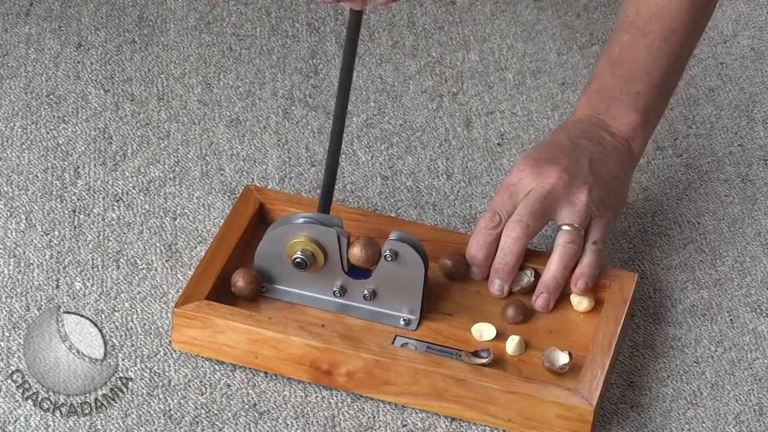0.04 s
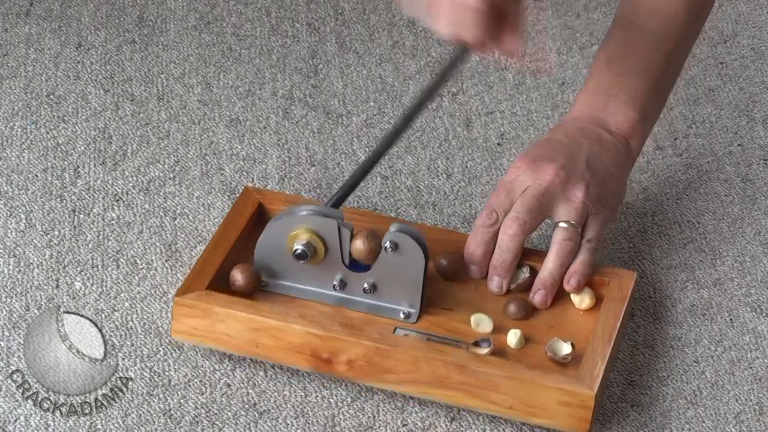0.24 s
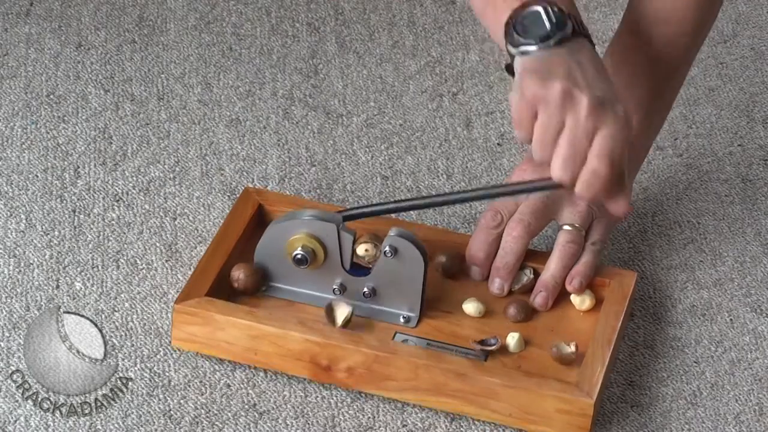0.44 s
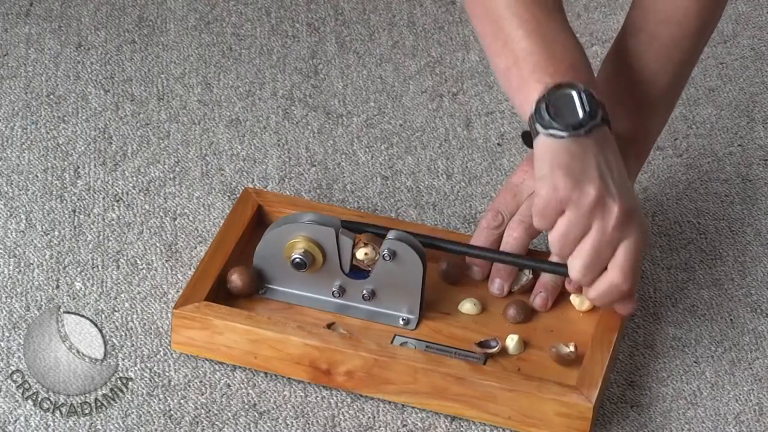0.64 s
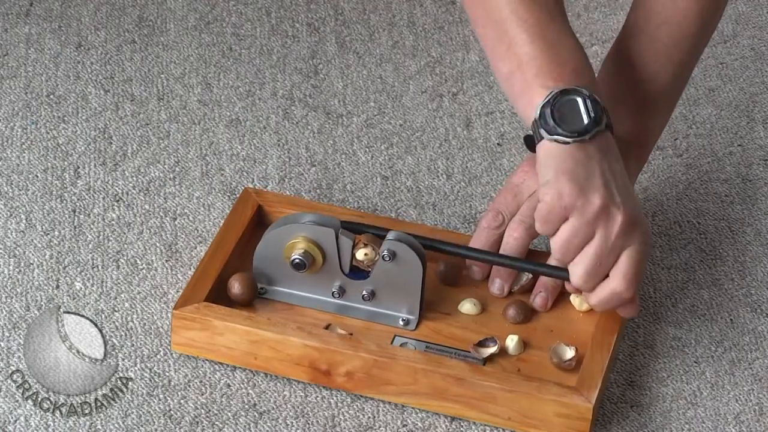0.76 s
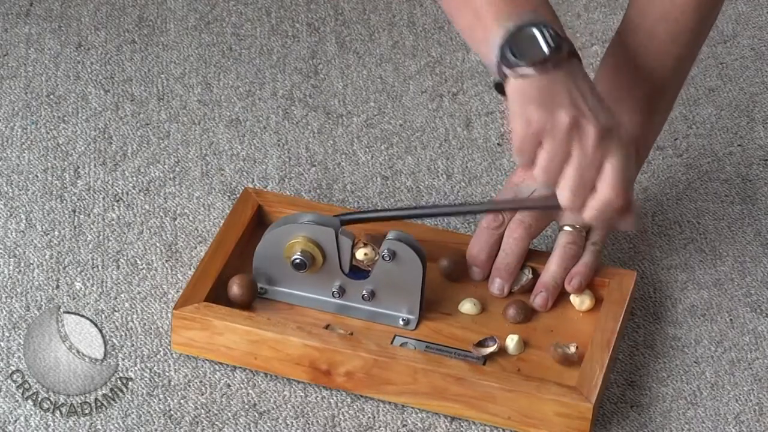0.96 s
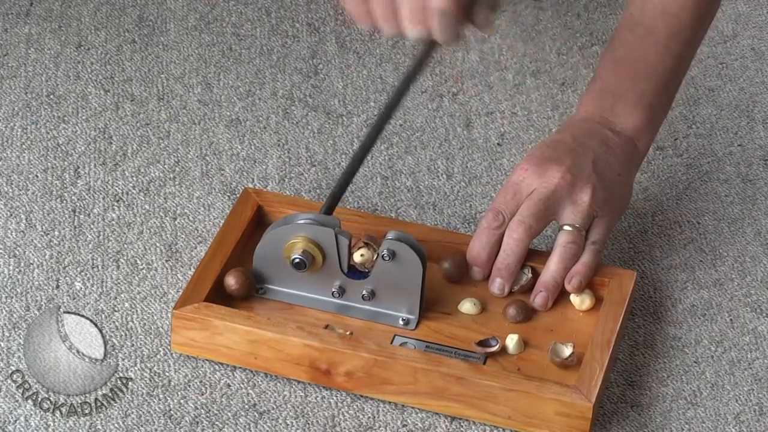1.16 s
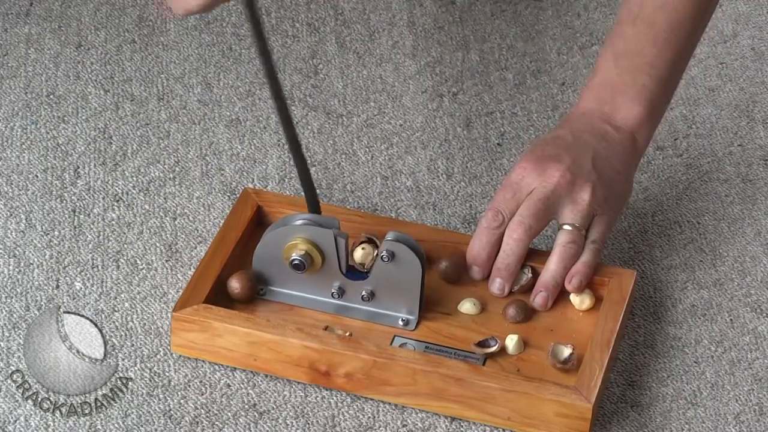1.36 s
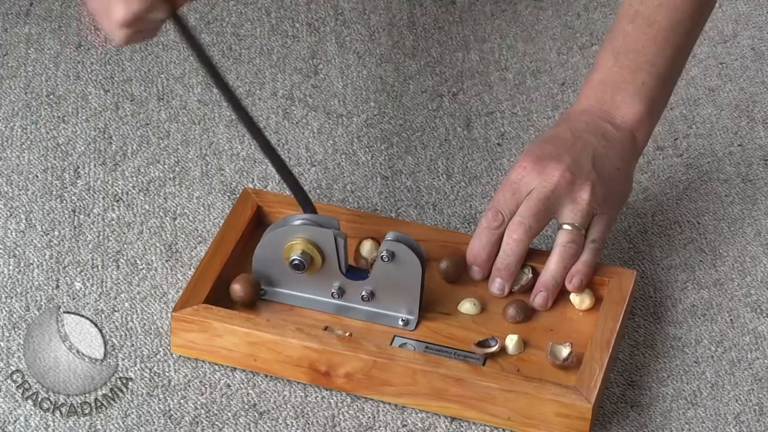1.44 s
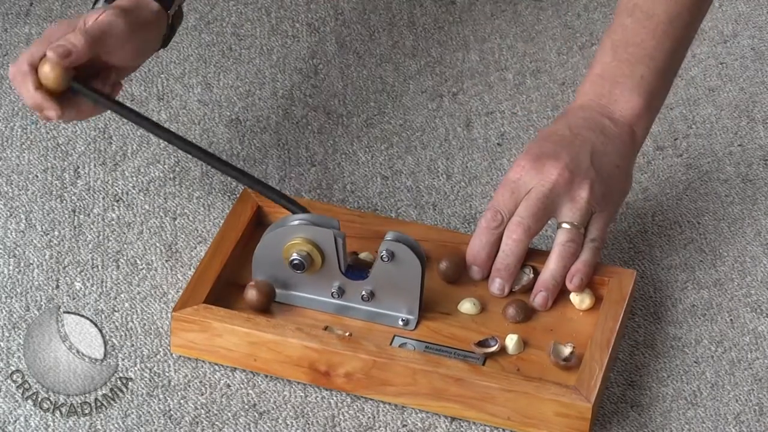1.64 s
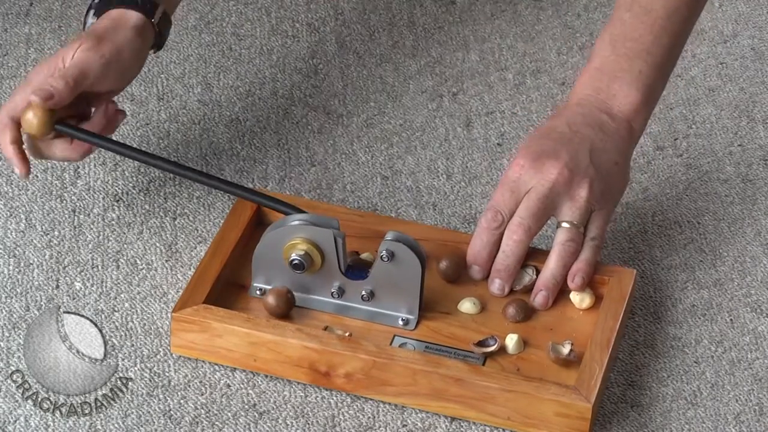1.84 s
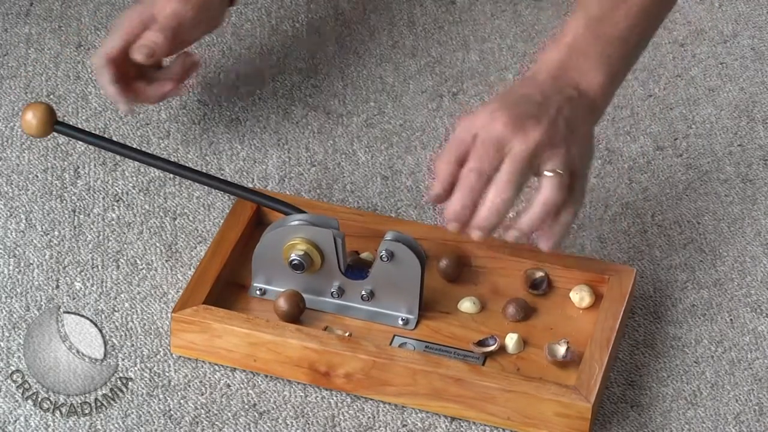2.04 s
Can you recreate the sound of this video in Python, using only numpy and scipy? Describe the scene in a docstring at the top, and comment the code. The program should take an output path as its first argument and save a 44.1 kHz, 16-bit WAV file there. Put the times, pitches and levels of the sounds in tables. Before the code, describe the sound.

A hard nut shell cracks in a steel nutcracker, with bits ticking onto wood.

```python
"""In a small room, a steel lever nutcracker works on a wooden tray. The jaw crunches into a hard shell, which
gives way in tiny slips until it bursts. Splinters land on the tray and the lever clacks against its stop. As
the lever swings back, its pivot rubs faintly, a loose nut knocks about, a few stray bits of shell tick, and the
cracked nut drops through the jaws. Each hit is a short tick plus a knock from the ringing tray."""
import sys
import numpy as np
from scipy import signal
from scipy.fft import rfft, irfft
from scipy.io import wavfile
from scipy.ndimage import uniform_filter1d, minimum_filter1d

SR = 44100
rng = np.random.default_rng(int(sys.argv[2]) if len(sys.argv) > 2 else 0)


def log_audio(samples):
    """Write samples as a 16-bit WAV file to the path given in sys.argv[1]."""
    # one column per channel
    frames = np.atleast_2d(samples).T
    # limit to full scale, then quantise
    limited = np.clip(frames, -1, 1)
    pcm = np.round(limited * 32767).astype(np.int16)
    wavfile.write(sys.argv[1], SR, pcm)


N = 92610
SPOTS = 3  # places on the tray, each with its own echoes

# Hits, each a tick and a tray knock: start_s, level_db, brightness_db_per_octave, knock_db
SPLINTER_HITS = [(.002, -59, 7, -72), (.4724, -40.5, 8, -45.5), (.478, -49, 11, -52),
                 (.4917, -35.5, -7, -44), (.497, -31.5, -6, -50), (.503, -32.5, 19.5, -62.5),
                 (.5088, -34.5, 17.5, -52), (.5314, -19.5, 4.5, -45.5), (.5372, -17.5, 1, -32.5),
                 (.551, -28, 0, -44.5), (.583, -42.5, -12.5, -54), (.628, -56, 16, -50.5)]
SHELL_SNAPS = [(.2099, -46, 16.5, -65.5), (.2158, -50, 13, -62.5), (.2363, -34.5, 8.5, -47.5),
               (.3772, -17.5, 0.5, -27), (.383, -21.5, -5, -23), (.3965, -21.5, -5.5, -35),
               (.4015, -36.5, 18, -36.5), (.4165, -23.5, 1.5, -40.5)]
LEVER_CLACKS = [(0.7151, -38.5, -8, -62), (0.716, -22, -2, -43), (0.718, -19.5, 3, -45.5),
                (0.7222, -24, -3, -36)]
LATE_HITS = [(1.281, -61, 12.5, -85), (1.2865, -56, 11, -85), (1.3095, -54, -16, -62),
             (1.503, -60, -5.5, -80), (1.5233, -48.5, 1, -69), (1.5264, -33, -1.5, -44.5),
             (1.532, -27.5, 6, -45), (1.5383, -34.5, 7, -50), (1.5462, -30.5, 1.5, -52),
             (1.5528, -33, 5, -49), (1.9445, -62.5, -1, -88)]
# Single squeaks, booms and bumps: start_s, level_db
JAW_SQUEAKS = [(.247, -35.5), (.261, -28), (.269, -28), (.276, -34.5), (.308, -36.5)]
TRAY_BOOMS = [(.262, -63.5), (.392, -45.5), (0.534, -71)]
NUT_BUMPS = [(1.1321, -65), (1.159, -81), (1.1947, -76), (1.8105, -59.5), (1.822, -61.5), (1.845, -64),
             (1.8977, -63), (1.921, -64), (1.956, -75), (1.994, -85), (2.0454, -71)]
# How longer sounds swell and fade: time_s, level_db
CREAK_LEVELS = [(.191, -63), (.207, -69.5), (.211, -46.5), (.235, -55)]
CRUNCH_LEVELS = [(.2362, -18.5), (.255, -29.5), (.275, -24.5), (.30, -21), (.332, -25.5), (.35, -29),
                 (.362, -28.5), (.369, -22), (.375, -34)]
PIVOT_LEVELS = [(1.04, -75), (1.1, -74.5), (1.182, -70), (1.26, -84), (1.62, -75.5), (1.76, -72.5),
                (1.9, -75.5), (2.05, -76)]
# A sound's colour is how strong it is from low to high: pitch_hz, relative_level_db
AIR_COLOUR = [(15, -41), (25, -3), (125, -2.5), (383, -10), (573, -3), (729, -14.5), (1090, -17),
              (1180, -17), (1460, -9.5), (2020, -15.5), (2240, -15), (2780, -17), (3260, -14),
              (4260, -20.5), (7890, -17), (10600, -29), (15000, -49.5)]
SPLINTER_COLOUR = [(60, -25.5), (300, -23.5), (600, -22), (1200, -6.5), (1900, -7), (3200, -1.5),
                   (4700, -9.5), (5900, -6), (7000, 0), (9200, -0.5), (10500, -10.5), (12500, -21.5),
                   (15500, -37)]
CRUNCH_COLOUR = [(20, -46.5), (55, -23.5), (150, -35.5), (450, -39), (800, -27), (1300, -7.5), (1700, -9),
                 (2000, -11.5), (2380, -5), (2700, -13), (3250, 0.5), (4000, -12), (6100, -11), (7300, -1),
                 (7950, 4), (8600, -5), (9900, -8.5), (12000, -25), (15500, -29.5)]
SHELL_COLOUR = [(50, -25.5), (150, -28.5), (400, -28.5), (800, -21.5), (1200, -5), (1900, -12), (2500, -4),
                (4400, -1.5), (5200, 3), (7500, 1), (9000, -3), (11200, -14), (15500, -25)]
BOOM_COLOUR = [(25, -21), (45, -1.5), (70, 1), (120, -11), (250, 1), (330, -1.5), (520, 4), (800, 5.5),
               (1300, -14.5), (3000, -50)]
STEEL_COLOUR = [(60, -37), (300, -35), (750, -37), (1100, -25.5), (1430, -12.5), (1950, -15), (2400, -5.5),
                (3000, -6.5), (3750, -9.5), (4350, -5.5), (4900, -4.5), (5250, -7.5), (6100, 0.5),
                (7200, -2.5), (8250, 0.5), (9200, -8.5), (9700, -12.5), (12100, -14), (15500, -31)]
PIVOT_COLOUR = [(100, -23), (300, -13), (450, -7.5), (580, 2.5), (760, -11), (1500, -12.5), (4000, -27)]
NUT_COLOUR = [(100, -49), (950, -33), (1600, -7.5), (2200, -8), (3150, -2.5), (4300, -9.5), (5800, -7),
              (7300, -11), (8250, -9), (9700, -21.5), (12000, -31.5), (15500, -44)]
# Tones that the tray and jaw ring with: pitch_hz, relative_level_db, fade_s (time to drop 60 dB)
TRAY_TONES = [(575, -28, .08), (731, -22, 0.06), (1163, -17, .03), (1364, -5, .04), (1433, 3.5, 0.033),
              (1510, -4, 0.054), (1709, -8.5, 0.079), (2296, -6, .045), (3240, -15, .04), (3307, -9, .04)]
JAW_TONES = [(2880, 1, 0.037), (3250, -4, 0.059), (3280, -1.5, .04)]
# How long the room's echo lasts: pitch_hz, fade_s
ROOM_FADES = [(100, 0.55), (500, 0.32), (1400, 0.33), (3500, 0.35), (7000, 0.37), (10000, 0.3),
              (15000, .24)]
# Stereo width, as a gain on the side signal (what differs between the ears): pitch_hz, gain_db
STEREO_WIDTH = [(40, -28.5), (100, -21.5), (250, -17.5), (700, -14), (1200, -11.5), (2400, -14),
                (4500, -16.5), (6500, -19), (8000, -17.5), (10000, -5.5), (12500, -23)]


def amp(db):
    return 10 ** (np.asarray(db) / 20)


def unit(x):
    """Scales a sound to an energy of one."""
    return x / np.sqrt(np.sum(x ** 2) + 1e-20)


def read(points, hz):
    """Looks up values between a table's pitches."""
    pitches, values = np.transpose(points)
    return np.interp(np.log(hz + 1), np.log(pitches + 1), values)


def add(mix, start_s, sound):
    part = mix[max(round(start_s * SR), 0):][:len(sound)]
    part += sound[:len(part)]


def tint(colour, tilt_db=0, size=4096):
    """A filter that gives a sound its colour; tilt_db per octave brightens the treble."""
    hz = np.fft.rfftfreq(size, 1 / SR)
    octaves = np.log2(np.clip(hz, 1500, 10000) / 4000)
    log_gain = np.log(amp(read(colour, hz) + tilt_db * octaves))
    mirrored = np.concatenate([log_gain, log_gain[-2:0:-1]])
    spectrum = np.exp(np.conj(signal.hilbert(mirrored)))  # keeps the start sharp
    return unit(np.fft.ifft(spectrum).real[:size // 2])


def ring(tones, size=4000):
    """A struck object rings with fading tones, never quite the same. Being small, it has little bass."""
    t = np.arange(size) / SR
    chance = rng.standard_normal((len(tones), 2)) * [1.5, .007]
    sound = np.zeros(size)
    for k, ((hz, db, fade_s), (extra_db, detune)) in enumerate(zip(tones, chance)):
        level = amp(db + extra_db) * np.exp(-np.log(1000) * t / fade_s)
        sound += (-1) ** k * level * np.sin(2 * np.pi * hz * (1 + detune) * t)
    return unit(signal.lfilter(*signal.butter(2, 600, "high", fs=SR), sound))


def tick(colour, tilt_db, decay_s, click_share, size=1024):
    """Two things touch: a sharp click and a quickly fading hiss."""
    hiss = rng.standard_normal(size) * np.exp(-np.arange(size) / SR / decay_s)
    sound = np.sqrt(1 - click_share) * unit(hiss)
    sound[0] += np.sqrt(click_share)
    return unit(signal.fftconvolve(sound, tint(colour, tilt_db)))


def blow(db):
    """The size of a hit whose level is averaged over 5 ms."""
    return amp(db) * np.sqrt(.005 * SR)


def hits(rows, colour, decay_s, click_share, tray_tilt_db=0):
    """Each hit ticks in its own material and knocks the tray at one of a few spots."""
    out = np.zeros((SPOTS, N))
    tones = [(hz, db + tray_tilt_db * np.log2(max(hz / 1500, 1)), fade_s)
             for hz, db, fade_s in TRAY_TONES]
    for k, (start_s, db, tilt_db, knock_db) in enumerate(rows):
        add(out[k % SPOTS], start_s, blow(db) * tick(colour, tilt_db, decay_s, click_share))
        add(out[k % SPOTS], start_s, blow(knock_db) * ring(tones))
    return out


def air(level_db=-72, drift_db=1.7):
    """Faint, drifting room noise, as mid (what both ears share) and side."""
    hz, _, spectrum = signal.stft(rng.standard_normal((2, N)), SR, nperseg=2048)
    drift = uniform_filter1d(rng.standard_normal(spectrum.shape[1:]), size=14, axis=0)
    drift = uniform_filter1d(drift, size=5, axis=1)
    gain = amp(read(AIR_COLOUR, hz)[:, None] + drift_db * drift / drift.std())
    mid, side = signal.istft(spectrum * gain, SR, nperseg=2048)[1][:, :N]
    return amp(level_db) / mid.std() * np.array([mid, amp(9.5) * side])


def splinters():
    """Bits of shell land on the tray with sharp ticks."""
    return hits(SPLINTER_HITS, SPLINTER_COLOUR, decay_s=.001, click_share=.6)


def shell_slips(levels, tilt_db, knock_db, count, slips_per_s=520):
    """The shell gives way in a fast, uneven run of tiny slips that each knock the tray."""
    times_s, levels_db = np.transpose(levels)
    chance = rng.standard_normal((count, 3))
    gaps_s = np.exp(.5 * chance[:, 0]) / slips_per_s
    starts_s = times_s[0] + np.cumsum(gaps_s) - gaps_s[0]
    sizes = np.sqrt(SR / slips_per_s) * amp(np.interp(starts_s, times_s, levels_db))
    out = np.zeros((SPOTS, N))
    for k, start_s in enumerate(starts_s):
        slip = tick(CRUNCH_COLOUR, tilt_db + chance[k, 2], decay_s=.00099, click_share=.28)
        add(slip, 0, amp(knock_db) * ring(TRAY_TONES, size=2500))
        if start_s < times_s[-1]:
            add(out[k % SPOTS], start_s, sizes[k] * slip)
    return out


def crunch():
    """A thin creak as the jaw starts to press, then the full crunch."""
    creak = shell_slips(CREAK_LEVELS, tilt_db=9.5, knock_db=-33, count=40)
    return creak + shell_slips(CRUNCH_LEVELS, tilt_db=1, knock_db=-18, count=120)


def shell_snaps():
    """The squeezed shell cracks, then bursts."""
    return hits(SHELL_SNAPS, SHELL_COLOUR, decay_s=.002, click_share=.25)


def jaw_squeaks():
    """The steel jaw rings briefly as it bites into the shell."""
    out = np.zeros((SPOTS, N))
    for k, (start_s, db) in enumerate(JAW_SQUEAKS):
        add(out[k % SPOTS], start_s, blow(db) * ring(JAW_TONES))
    return out


def tray_boom(rise_s=.0083, decay_s=.049):
    """The hardest jolts make the tray and floor boom: low noise that swells and dies away."""
    out, t = np.zeros(N), np.arange(SR) / SR
    swell = (1 - np.exp(-t / rise_s)) * np.exp(-t / decay_s)
    for start_s, db in TRAY_BOOMS:
        noise = signal.fftconvolve(rng.standard_normal(2 * SR), tint(BOOM_COLOUR))[SR:2 * SR]
        add(out, start_s, amp(db) * noise * swell / swell.max())
    return out


def lever_clacks():
    """The steel lever strikes its stop."""
    return hits(LEVER_CLACKS, STEEL_COLOUR, decay_s=.0015, click_share=.3)


def pivot_rub():
    """The pivot rubs, faint and low, as the lever swings back."""
    noise = signal.fftconvolve(rng.standard_normal(N), tint(PIVOT_COLOUR))[:N]
    level_db = np.interp(np.arange(N) / SR, *np.transpose(PIVOT_LEVELS), left=-120)
    return noise * amp(level_db)


def loose_nut(tick_db=-7, tilt_db=-11):
    """A loose nut rolls over the wood with soft, dull bumps."""
    rows = [(start_s, db + tick_db, tilt_db, db) for start_s, db in NUT_BUMPS]
    return hits(rows, NUT_COLOUR, decay_s=.0025, click_share=.15, tray_tilt_db=-6)


def stray_bits_and_nut():
    """A few stray bits of shell tick on the tray, then the cracked nut comes free and tumbles onto it."""
    return hits(LATE_HITS, NUT_COLOUR, decay_s=.0025, click_share=.15)


def room(sound, tail_db=-3, onset_s=.012, early_db=-4.5, early_decay_s=.0086):
    """The sound, its early echoes off tray and floor, and the room's fading tail, as mid and side."""
    hz, t, spectrum = signal.stft(rng.choice([-1., 1.], (2, 30000)), SR, nperseg=256)
    fade = np.exp(-np.log(1000) * t / read(ROOM_FADES, hz)[:, None])
    tails = signal.istft(spectrum * fade, SR, nperseg=256)[1]
    t = np.arange(tails.shape[1]) / SR
    tails *= 1 - np.exp(-(t / onset_s) ** 2)
    echoes = rng.choice([-1., 1.], tails.shape) * np.exp(-t / early_decay_s)
    echoes *= rng.random(tails.shape) < 2000 / SR  # about 2000 echoes a second
    mid, side = (amp(tail_db) * unit(tail) + amp(early_db) * unit(early)
                 for tail, early in zip(tails, echoes))
    mid[1] += 1  # the direct sound
    side[:3] += .33 * np.array([1, 0, -1])  # widens it a little
    return signal.fftconvolve(sound[None], np.array([mid, side]), axes=1)[:, :N]


def scene():
    """Puts all the sounds in the room and turns mid and side into left and right."""
    spots = (crunch() + jaw_squeaks() + shell_snaps() + splinters()
             + lever_clacks() + stray_bits_and_nut() + loose_nut())
    mix = sum(room(spot) for spot in spots) + air()
    mid, side = (channel + tray_boom() + pivot_rub() for channel in mix)
    width = amp(read(STEREO_WIDTH, np.fft.rfftfreq(N, 1 / SR)))
    side = irfft(rfft(side) * width, N)
    return np.array([mid + side, mid - side])


def record(dry):
    """Briefly turns down the loudest peaks, then cuts the very highest treble."""
    ceiling, hold_s, cutoff_hz = .31, .002, 15250
    hold = int(hold_s * SR)
    gain = np.minimum(1, ceiling / (abs(dry).max(0) + 1e-9))
    gain = uniform_filter1d(minimum_filter1d(gain, hold), hold)
    treble_cut = signal.firwin(255, cutoff_hz, window=("kaiser", 8), fs=SR)
    return signal.oaconvolve(dry * gain, treble_cut[None], "same")


dry = scene()
out = record(dry)
log_audio(out)
```